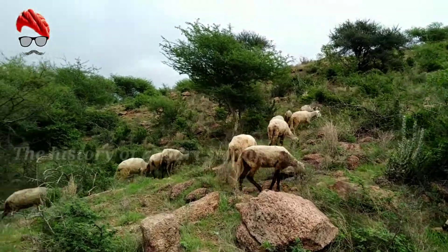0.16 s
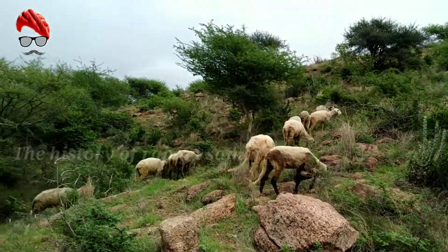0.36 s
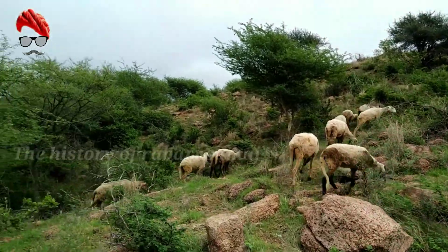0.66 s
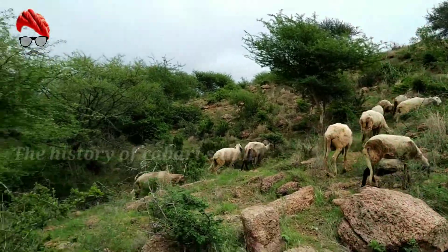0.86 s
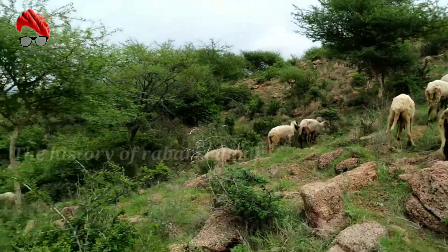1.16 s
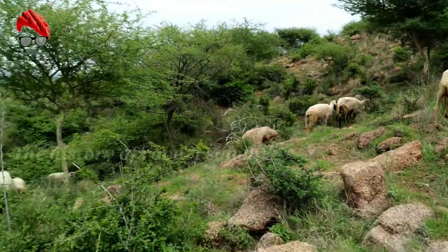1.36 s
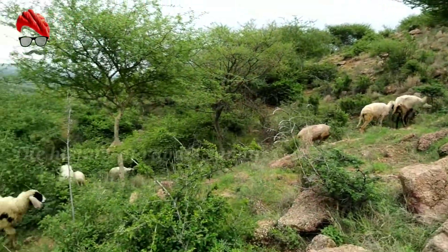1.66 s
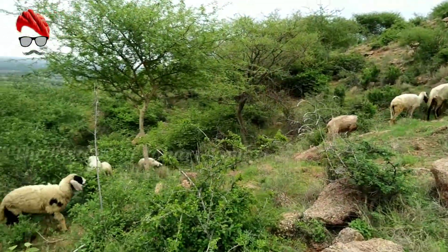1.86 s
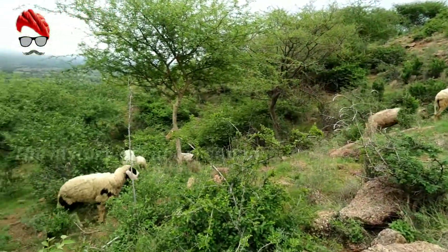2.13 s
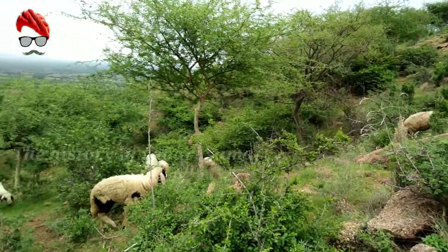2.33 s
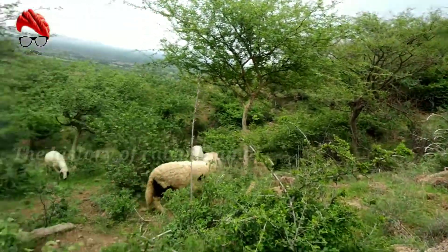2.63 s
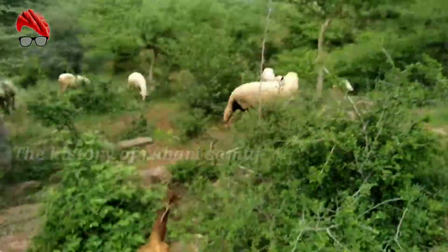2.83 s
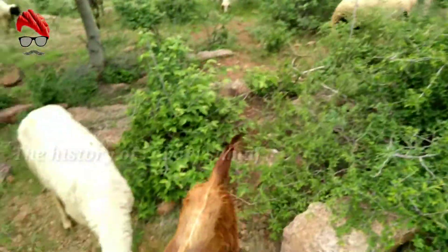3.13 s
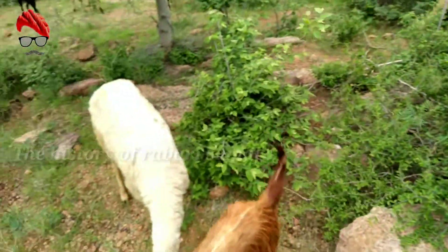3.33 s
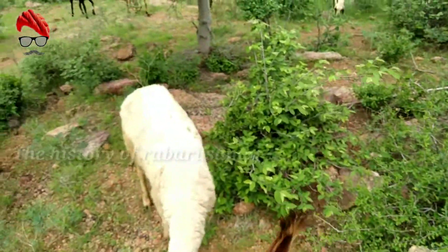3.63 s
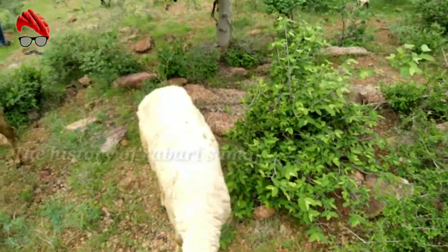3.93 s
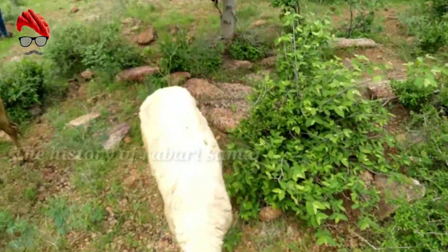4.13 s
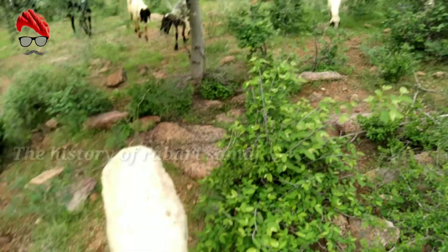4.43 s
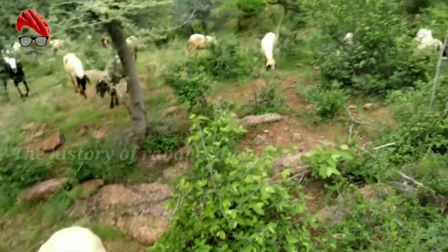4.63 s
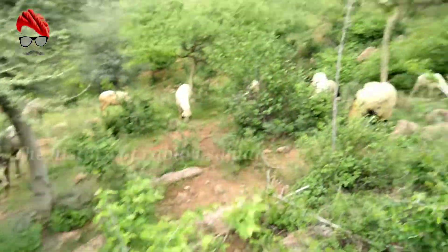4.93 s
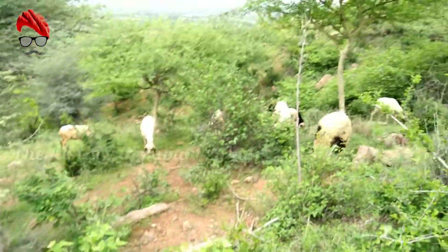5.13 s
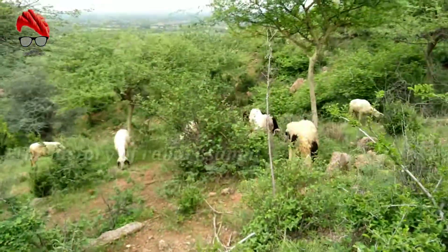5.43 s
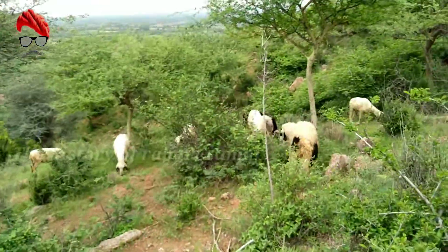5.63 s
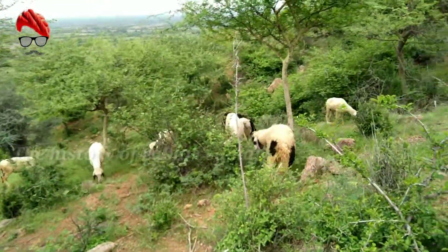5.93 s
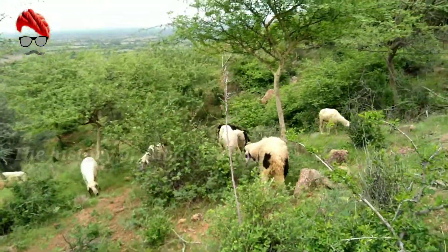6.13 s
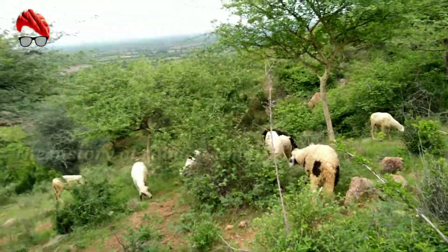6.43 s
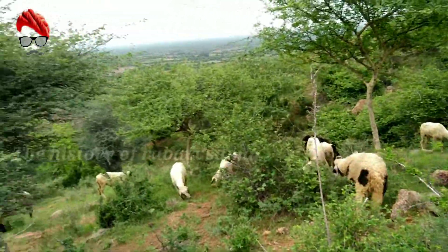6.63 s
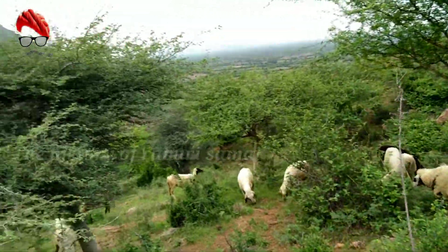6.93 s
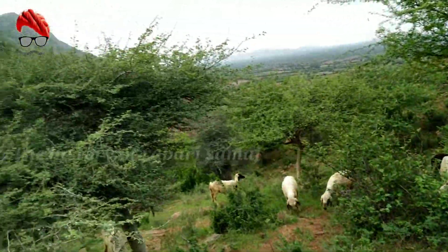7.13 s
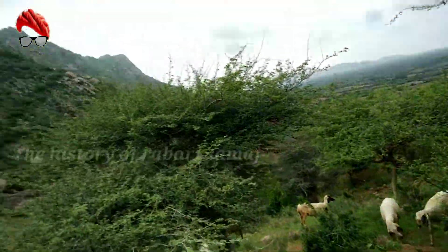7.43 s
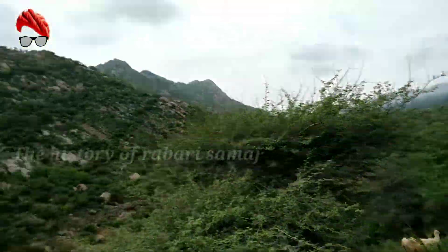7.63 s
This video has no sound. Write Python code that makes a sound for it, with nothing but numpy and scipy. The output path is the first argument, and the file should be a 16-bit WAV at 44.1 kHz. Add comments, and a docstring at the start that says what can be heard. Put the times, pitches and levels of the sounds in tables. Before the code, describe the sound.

A single loud, quavering sheep bleat, nasal then open and hoarse, over quiet hillside scrub with twig snaps, small birds and low wind.

```python
"""One loud, quavering bleat of a sheep on a scrubby hillside: voice pulses through moving resonances,
nasal at first, then wide open, hoarse at the end. The flock brushes through bushes (clumps of tiny rings)
and steps on twigs and stones (rung knocks with cracks); small birds whistle in gliding sines, an insect trills.
A hand and a sleeve rub the camera in shaped noise, a light wind rumbles on the microphone and stirs
the leaves, and the slope returns a faint echo: a decaying noise tail."""
import sys
import numpy as np
from scipy import signal
from scipy.fft import rfft, irfft, next_fast_len
from scipy.io import wavfile
from scipy.ndimage import uniform_filter1d, map_coordinates

SR = 44100
rng = np.random.default_rng(int(sys.argv[2]) if len(sys.argv) > 2 else 0)


def generate_wav(signal):
    """Clip the signal to [-1, 1] and save it as 16-bit WAV at the path in sys.argv[1]."""
    frames = np.transpose(np.atleast_2d(signal))
    scaled = np.clip(frames, -1, 1) * 32767
    pcm = np.round(scaled).astype(np.int16)
    wavfile.write(sys.argv[1], SR, pcm)


N = 343098  # samples in the scene


def amp(db):
    """Decibels to gain."""
    return 10 ** (np.asarray(db) / 20)


def unit(x):
    """Scale to rms 1."""
    return x / np.sqrt(np.mean(x ** 2) + 1e-20)


def along(points, hz):
    """(frequency [Hz], value) points read on a log frequency axis."""
    f, v = np.transpose(points)
    return np.interp(np.log(hz + 1), np.log(f + 1), v)


def curves(rows, t):
    """Each column after the time, read at the times t."""
    s, *cols = np.transpose(rows)
    return [np.interp(t, s, c) for c in cols]


def clock(length):
    """Sample times over a length in seconds."""
    return np.arange(max(int(length * SR), 8)) / SR


def wobble(rate, t):
    """A smooth random curve, rate knots a second."""
    knots = rng.standard_normal(int(len(t) * rate / SR) + 4)
    return map_coordinates(knots, [(t - t[0]) * rate])


def filtered(x, response):
    """x shaped by a (possibly complex) response of frequency."""
    m = next_fast_len(len(x) + 8192)
    return irfft(rfft(x, m) * response(np.fft.rfftfreq(m, 1 / SR)), m)[:len(x)]


def noise(spectrum, patchy_db):
    """Noise of rms 1 with the given colour, in patches of random gain over time and frequency."""
    z = signal.stft(rng.standard_normal(N), nperseg=512)[2]
    field = uniform_filter1d(rng.standard_normal(z.shape), size=5, axis=0)
    field = uniform_filter1d(field, size=8, axis=1)
    patchy = signal.istft(z * amp(patchy_db * unit(field)), nperseg=512)[1][:N]
    return unit(filtered(patchy, lambda hz: amp(along(spectrum, hz))))


def random_colour(low_hz, high_hz, points, spread_db):
    """An uneven spectrum of random levels, as (frequency [Hz], level [dB]) points."""
    return np.column_stack([np.geomspace(low_hz, high_hz, points), rng.normal(0, spread_db, points)])


def resonances(modes, f):
    """Causal response of (centre [Hz], width [Hz], level [dB]) resonances, of alternating polarity."""
    return sum((-1) ** k * amp(db) * 1j * f * w / (c * c - f * f + 1j * f * w)
               for k, (c, w, db) in enumerate(modes))


def band(f, low_hz, high_hz, order=4):
    """Gain of a band with sloping edges."""
    return 1 / np.sqrt((1 + (low_hz / (f + 1)) ** (2 * order)) * (1 + (f / high_hz) ** (2 * order)))


def add(track, s, sound):
    """Mix a sound into the track at s seconds."""
    part = track[max(round(s * SR), 0):][:len(sound)]
    part += sound[:len(part)]


def grains(length, low_hz, high_hz, rate, cycles, spread_db):
    """Tiny impacts at random moments, each a damped ring of its own pitch and size."""
    size, t = len(clock(length)), clock(0.0077)
    when, height, chance = rng.random((int(rate * length) + 1, 3)).T[:, :, None]
    hz = low_hz * (high_hz / low_hz) ** height
    strength = amp(-spread_db * np.log(chance + 0.017)) * (hz / low_hz) ** 0.15  # short rings hit harder
    rings = strength * np.sin(2 * np.pi * hz * t) * np.exp(-t * hz / cycles) * (1 - np.exp(-t * hz))
    places = (when * size).astype(int) + np.arange(len(t))
    return np.bincount(places.ravel(), rings.ravel(), size)[:size]


def throat(folds, shift, modes, low_hz, high_hz):
    """Resonances that move: filtering on a stretched time axis scales all their frequencies."""
    stretched = np.cumsum(shift)
    grid = np.arange(int(stretched[-1]) + 2)
    source = map_coordinates(folds, [np.interp(grid, stretched, np.arange(len(folds)))])
    voiced = filtered(source, lambda f: resonances(modes, f) * band(f, low_hz, high_hz, order=7))
    return unit(map_coordinates(voiced, [stretched]))


# throbs of the bleat, about 15 a second: (crest time [s], level at the crest [dB], crest pitch [Hz],
# pitch in the sag after it [Hz], dip in that sag [dB])
BLEAT_THROBS = [(1.739, -66.5, 308.3, 285.4, 20), (1.822, -60.5, 290, 270.2, 4.5),
                (1.88, -30, 300, 265.7, 15), (1.954, -26.5, 309, 268.6, 13),
                (2.013, -23.5, 299.3, 289, 0.5), (2.066, -23, 316.6, 305.7, 2),
                (2.123, -23, 317.8, 291.2, 1.5), (2.18, -22.5, 321.3, 284.5, 6),
                (2.245, -22.5, 315.4, 286.7, 7), (2.309, -21, 316.5, 285.8, 4.5),
                (2.378, -21.5, 316.9, 275.3, 8.5), (2.442, -22.5, 309.3, 271.4, 23.5),
                (2.515, -24.5, 303.7, 267.5, 23.5), (2.6, -32, 302.8, 259.6, 10),
                (2.668, -26, 295.4, 263.7, 17), (2.741, -29.5, 297.3, 261.3, 15.5),
                (2.816, -37, 290, 266.3, 18), (2.864, -55, 277.4, 269.3, 12.5)]
# hoarseness, least at the height of the voice: (time [s], relative roughness [0-1])
HOARSENESS = [(1.73, 0.01), (1.77, 0.31), (1.86, 0.08), (1.98, 0.12), (2.08, 0), (2.35, .05), (2.48, 0.2),
              (2.63, 0.23), (2.82, 0.22), (2.88, 0.33)]
# sound through the nose and from the open pharynx:
# (time [s], hum level [dB], snout level [dB], pharynx level before its dips [dB])
NASAL_LEVELS = [(1.715, -36.5, -59.5, -73.5), (1.745, -37.5, -43, -66), (1.785, -45.5, -45, -67.5),
                (1.825, -41, -46.5, -62), (1.86, -51.5, -53, -41), (2.02, -56.5, -73.5, -48),
                (2.12, -55.5, -72.5, -42.5), (2.24, -52, -74.5, -42), (2.38, -48, -72.5, -43.5),
                (2.45, -45, -71.5, -52), (2.83, -46, -57.5, -47), (2.9, -51.5, -79.5, -64)]
# the mouth opens, rounds and shuts: (time [s], middle, upper and highest formants, each over the first [dB],
# factor on the middle formants' pitch [ratio], factor on the upper formants' pitch [ratio])
MOUTH_SHAPE = [(1.82, 3, -9, -17, 0.87, 0.75), (1.875, 4, 3.5, -16.5, 0.94, .99),
               (1.955, -0.5, -4.5, -15.5, 0.99, 1), (2.02, -0.5, -12, -27, 0.97, .98),
               (2.07, -1.5, -8, -20, 1.02, 1), (2.12, -4, -6.5, -18, 1.02, 1),
               (2.18, -5, -8.5, -18, 0.96, 1.01), (2.25, -6.5, -9, -16.5, 0.99, 1),
               (2.31, -10, -14, -18.5, 0.96, 1), (2.38, -15, -18, -21, 1.006, 1.02),
               (2.445, -11, -18.5, -20.5, 1, 1.09), (2.52, -8, -18.5, -17.5, 1.03, 0.94),
               (2.6, -2.5, -13.5, -15.5, 0.97, 1.015), (2.67, -9, -16.5, -18.5, 1.02, 1),
               (2.74, -1.5, -16, -19.5, 1.02, 1.05), (2.82, 4.5, -5.5, -14, 1.013, 1.03)]
# resonances of nose and throat, from the hum upwards: (centre [Hz], width [Hz], level [dB])
NOSE_HUM = [(290, 550, 0)]
SNOUT_MODES = [(900, 100, -13), (1460, 120, 3.5), (2400, 58, 0), (3080, 110, -12)]
PHARYNX_MODE = [(650, 110, 0)]
FIRST_FORMANT = [(891, 69.4, 0)]
MIDDLE_FORMANTS = [(1585, 150, 1.5), (1770, 140, 4.5)]
UPPER_FORMANTS = [(2400, 250, -9.5), (2847, 71, 0), (3049, 92, 4)]
HIGHEST_FORMANTS = [(3320, 83, -4), (3670, 240, 0), (4100, 200, -7.5), (4380, 200, -10.5)]
# colour of the breathy hiss above the formants: (frequency [Hz], relative level [dB])
RASP_COLOUR = [(3500, -30), (4600, 2.5), (5200, 2.5), (6200, -17.5), (8000, -12.5), (9500, -16.5),
               (12000, -14.5), (14000, -41)]
RASP_DB = -37.5  # that hiss, against the first formant
PITCH_FALL_S, FORCE_FALL_S = 0.017, .027  # from a crest to the bottom of its sag
BLEAT_LEAD_S, BLEAT_TAIL_S = .03, 0.079  # voice before the first crest and after the last
BLEAT_FADE_S = .018  # the voice swells in and dies away
ONSET_HZ, ONSET_S = 44.8, .018  # the voice starts this much too high; decay time of its slide down
FIRST_FOLLOWS, MIDDLE_FOLLOWS = 0.6, 0.093  # how far a formant rises with the pitch, as an exponent
PHARYNX_DIP_DB, BRIGHT_DIP_DB = 9.5, 2.5  # a slack throb is duller: extra dips of pharynx and high formants
FALL_ROUGH, FLUTTER = .085, 0.7  # roughness added as the pitch falls; depth of the rough flutter


def bleat():
    """Vocal fold pulses through nose and throat; pitch and force climb to each crest and sag quickly after."""
    crest, crest_db, crest_hz, sag_hz, dip_db = np.transpose(BLEAT_THROBS)
    start = crest[0] - BLEAT_LEAD_S
    t = start + clock(crest[-1] + BLEAT_TAIL_S - start)
    rough, = curves(HOARSENESS, t)
    hum_db, snout_db, pharynx_db = curves(NASAL_LEVELS, t)
    middle_db, upper_db, highest_db, middle_shift, upper_shift = curves(MOUTH_SHAPE, t)

    def sawtooth(at_crest, at_sag, fall):
        """A rounded sawtooth between the values at each crest and shortly after it."""
        knots = np.column_stack([crest + .002, crest + fall])
        values = np.column_stack([at_crest, at_sag])
        return uniform_filter1d(np.interp(t, knots.ravel(), values.ravel()), size=300)

    # force stays high for most of a throb, with a short gap between throbs
    fade = np.clip(np.minimum(t - start, t[-1] - t) / BLEAT_FADE_S, 0, 1)
    sag = sawtooth(np.zeros(len(crest)), np.ones(len(crest)), FORCE_FALL_S)
    dip = np.interp(t, crest + FORCE_FALL_S, dip_db) * np.sin(np.pi / 2 * sag) ** 3.5
    throb = fade * amp(-dip)
    strength = amp(np.interp(t, crest, crest_db))
    pitch = sawtooth(crest_hz, sag_hz, PITCH_FALL_S) + ONSET_HZ * np.exp(-(t - start) / ONSET_S)
    tension, still = pitch / 302, np.ones(len(t))

    # the folds lose their regularity each time the pitch falls and in the slack gaps
    falling = uniform_filter1d(1. * (np.gradient(pitch) < -.012), size=400)
    rough = rough * (.55 + .8 * falling + 1.7 * (1 - throb)) + FALL_ROUGH * falling
    rough = np.clip(rough, 0, .55)
    jitter = .06 * rough * wobble(260, t) + .006 * wobble(90, t)
    phase = 2 * np.pi * np.cumsum(pitch * (1 + jitter)) / SR
    pulses = unit(sum(np.cos(k * phase) for k in range(1, 41)))
    air = unit(rng.standard_normal(len(t)) * (1 + 0.5 * np.cos(phase)))
    voiced = pulses * (1 + FLUTTER * rough * wobble(280, t))
    folds = voiced * (1 + rough * wobble(170, t)) + 1.8 * rough * air
    windy = folds + .5 * rough * air  # the high formants ring with more turbulence
    breathy = voiced + rough * air

    hum = amp(hum_db) * throat(breathy, still, NOSE_HUM, 140, 450)
    snout = amp(snout_db) * throat(folds, still, SNOUT_MODES, 1000, 3300)
    pharynx_gain = amp(pharynx_db - PHARYNX_DIP_DB * sag)
    pharynx = pharynx_gain * throat(breathy, still, PHARYNX_MODE, 520, 740)
    first = throat(voiced + 2.3 * rough * air, tension ** FIRST_FOLLOWS, FIRST_FORMANT, 700, 1700)
    middle_moves = middle_shift * tension ** MIDDLE_FOLLOWS
    middle = amp(middle_db) * throat(folds, middle_moves, MIDDLE_FORMANTS, 1400, 2500)
    upper = amp(upper_db) * throat(windy, upper_shift, UPPER_FORMANTS, 2100, 3600)
    highest = amp(highest_db) * throat(windy, still, HIGHEST_FORMANTS, 3200, 4457)
    rasp = amp(RASP_DB) * noise(RASP_COLOUR, patchy_db=6)[:len(t)] * unit(1 + .8 * np.cos(phase))

    dulling = amp(-BRIGHT_DIP_DB * sag ** 2)
    mouth = strength * (first + rasp + dulling * (upper + highest))
    voice = throb * (hum + snout + pharynx + mouth)
    voice -= strength * throb ** .85 * dulling * middle  # middle formants in opposite polarity
    out = np.zeros(N)
    add(out, start, voice)
    return out


TWIG_CRACK_DB, HOOF_CRACK_DB = -5.5, -24  # the sharp crack over the knock
CRUMB_DB, CRUMB_S = -11.5, 0.01  # grit giving way: relative level, decay time
CRACK_TOP = 1.3  # a crack's top over the knock's pitch, held between 5000 and 7800 Hz
SPLINTER_S, SPLINTER_DB = 0.012, -8  # fibres that tear after a crack: decay time, middle level


def snaps(contacts, crack_db):
    """Each contact is a knock of a few cycles and a short crack; crumbs of grit or fibre give way after it."""
    out, t = np.zeros(N), clock(0.17)
    onset = 1 - np.exp(-(t / .0016) ** 2)
    for s, db, hz in contacts:
        colour = random_colour(1500, 12000, 24, spread_db=5)  # each contact has its own
        push = rng.standard_normal(len(t)) * onset * np.exp(-t / (0.00089 + 0.94 / hz))
        knock = filtered(push, lambda f: resonances([(hz, 0.12 * hz, 0)], f) * band(f, hz / 3, hz * 2.15))
        top_hz = np.clip(CRACK_TOP * hz, 5000, 7800)
        crack = filtered(rng.standard_normal(len(t)),
                         lambda f: band(f, 2700, top_hz, order=6) * amp(along(colour, f)))
        splinters = amp(SPLINTER_DB + 5 * wobble(500, t)) * np.exp(-t / SPLINTER_S)
        crack = unit(crack) * onset * (np.exp(-t / 0.0014) + splinters)
        crumbs = grains(len(t) / SR, hz * 0.62, min(hz * 1.7, 9000), rate=400, cycles=9.7, spread_db=5.5)
        crumbs = np.resize(crumbs, len(t))
        crumbs = crumbs / np.abs(crumbs).max() * onset * np.exp(-t / CRUMB_S) * 2
        knock /= np.abs(knock).max()
        add(out, s, amp(db) * (knock + amp(crack_db) * crack + amp(CRUMB_DB) * crumbs))
    return out


# twigs and dry stalks snapping: (time [s], peak level of the knock [dB], pitch [Hz])
TWIG_SNAPS = [(.281, -41.5, 4530), (.294, -39, 1173), (.294, -36, 5800), (1.054, -31.5, 2250),
              (1.686, -44, 5800), (1.757, -41.5, 5600), (2.389, -48, 5143), (2.632, -33.5, 2400),
              (5.499, -46, 6200), (5.522, -39, 5670), (6.019, -39.5, 5680), (6.435, -47.5, 3750),
              (6.519, -45.5, 6080), (6.617, -44, 3640), (6.643, -43, 2700), (6.836, -46, 6940)]


def twigs():
    """Dry stalks break: the crack is nearly as strong as the knock."""
    return snaps(TWIG_SNAPS, TWIG_CRACK_DB)


# hooves on earth and stones: (time [s], peak level of the knock [dB], pitch [Hz])
HOOF_STEPS = [(1.296, -46.5, 1680), (1.62, -43.5, 1680), (2.546, -34.5, 277), (2.974, -39.5, 470.7),
              (3.247, -41.5, 283), (3.287, -45.5, 393), (3.468, -50, 1068), (4.356, -48, 422),
              (4.404, -43.5, 1400), (4.535, -36.5, 1920), (4.558, -42, 1850), (4.686, -32, 1840),
              (4.688, -43, 790), (4.829, -45, 2500), (4.975, -31.5, 1960), (5.103, -50, 1020),
              (5.2, -45, 2403), (5.498, -36, 1610), (5.529, -40, 1700), (5.579, -45.5, 1840),
              (5.625, -42.5, 1068), (6.82, -42.5, 1770), (6.846, -42, 1700), (7.083, -51.5, 520),
              (7.521, -43, 1510)]


def hooves():
    """Hooves strike earth and stones: mostly knock, with little crack."""
    return snaps(HOOF_STEPS, HOOF_CRACK_DB)


# bodies brushing through scrub and feet scuffing:
# (time [s], length [s], centre [Hz], level before the swell [dB])
SCRUB_RUSTLES = [(0.187, .11, 3000, -56.5), (0.295, .15, 7150, -58), (0.975, 0.096, 1750, -59.5),
                 (1.057, .11, 2188, -60.5), (2.604, 0.3, 6540, -55), (2.878, .12, 588, -58),
                 (3.151, 0.26, 376, -58), (3.765, 0.08, 229, -58.5), (4.524, 0.1, 1813, -60.5),
                 (4.973, .16, 5800, -62.5), (5.22, .13, 5720, -61), (5.552, 0.28, 1053, -65.5),
                 (5.544, .3, 4260, -66), (5.95, 0.13, 3040, -59.5), (6.08, 0.076, 365, -57.5),
                 (6.28, .08, 6350, -61.5), (6.515, 0.17, 4436, -60.5), (6.745, .16, 7090, -61.5),
                 (6.815, 0.087, 2000, -57)]
BASS_SPREAD, SPREAD_GROWS = 1.3, .08  # pitches reach this factor either way at 350 Hz, wider when higher


def rustles():
    """Clumps of leaf and grit impacts swell quickly and die away; each has its own uneven colour."""
    out = np.zeros(N)
    for s, length, hz, db in SCRUB_RUSTLES:
        t = clock(length)
        spread = BASS_SPREAD * (hz / 350) ** SPREAD_GROWS
        low_hz, high_hz = hz / spread, hz * spread
        clump = grains(length, low_hz, high_hz, rate=250 + .12 * high_hz, cycles=6, spread_db=5.5)
        clump = clump * amp(3.5 * wobble(60, t))
        colour = random_colour(200, 12000, 36, spread_db=3.5)
        leaves = filtered(clump, lambda f: band(f, low_hz, high_hz * 3.1, order=6) * amp(along(colour, f)))
        swell = np.abs(np.sin(np.pi * (t / t[-1]) ** 0.51))
        add(out, s, amp(db) * unit(leaves) * swell)
    return out


def brush(s, length, db, spectrum, fullness):
    """Fibres or leaves slide past together: a dense, finely grained rush that swells and fades."""
    t, out = clock(length), np.zeros(N)
    slips = rng.standard_normal(len(t)) * amp(3 * wobble(600, t) + 1.8 * wobble(110, t))
    rush = unit(filtered(slips, lambda f: amp(along(spectrum, f))))
    add(out, s, amp(db) * rush * np.abs(np.sin(np.pi * t / t[-1])) ** (1 / fullness))
    return out


# colour of a leafy branch: (frequency [Hz], relative level [dB])
BRANCH_COLOUR = [(700, -49), (1300, -14), (1900, -1.5), (2550, 2.5), (3300, 0), (4300, -7), (5550, 2.5),
                 (6300, -5.5), (7200, -17), (8200, -41), (13000, -41.5)]


def swish():
    """A leafy branch whips past: one short rush of noise."""
    return brush(s=.076, length=.112, db=-42.5, spectrum=BRANCH_COLOUR, fullness=1.2)


# resonances of the camera's case, each applied twice: (centre [Hz], width of one pass [Hz], level [dB])
CASE_MODES = [(376, 224, 5.5), (670, 194, 4.5), (1000, 220, 4), (1700, 260, 1), (2000, 330, -7.5),
              (2625, 190, 1), (3290, 430, -6), (3780, 350, -3), (4940, 450, -6)]


def case(x, low_hz, high_hz):
    """The camera's case rings with its fixed resonances, within the band that the touch excites."""
    def ringing(f):
        return sum(resonances([(hz, width, 0)], f) ** 2 * amp(level) for hz, width, level in CASE_MODES)

    return filtered(x, lambda f: ringing(f) * band(f, low_hz, high_hz, order=7))


# a hand sliding on the case: (time [s], length [s], lowest [Hz], highest [Hz], relative level [dB])
HAND_RUBS = [(3.949, 0.39, 329, 1610, -59.5), (4.675, 0.072, 250, 4100, -45.5),
             (4.749, 0.05, 280, 4300, -45), (4.956, 0.21, 910, 2560, -54.5)]


def rubs():
    """Skin slips over the case in clumps of tiny jerks, heard through the case and directly."""
    out = np.zeros(N)
    for s, length, low_hz, high_hz, db in HAND_RUBS:
        t = clock(length)
        clumps_db = 4 * wobble(600, t) + 3 * wobble(220, t) + 1.5 * wobble(70, t)
        slips = rng.standard_normal(len(t)) * amp(clumps_db)
        grip = random_colour(200, 8000, 48, spread_db=3)  # each grip damps the case differently
        skin = unit(filtered(slips, lambda f: band(f, low_hz, high_hz)))
        ring = unit(case(slips, low_hz, high_hz)) + 0.27 * skin
        ring = filtered(ring, lambda f: amp(along(grip, f)))
        add(out, s, amp(db - 1.5) * unit(ring) * np.abs(np.sin(np.pi * t / t[-1])) ** 0.41)
    return out


# fingers bumping the case: (time [s], peak level [dB], highest [Hz])
FINGER_BUMPS = [(4.058, -45, 588), (4.177, -38, 1510), (4.238, -38, 640), (4.72, -48, 3000),
                (4.785, -38.5, 1800), (4.86, -44, 600), (7.607, -40, 3800), (7.725, -32, 705),
                (7.732, -35, 5200), (7.738, -46, 1500)]
BUMP_S = 0.0042  # sets how fast a fingertip's contact dies


def bumps():
    """A fingertip's brief push sets the case ringing."""
    out, t = np.zeros(N), clock(.08)
    for s, db, high_hz in FINGER_BUMPS:
        ring = case(rng.standard_normal(len(t)) * t * np.exp(-2 * t / BUMP_S), 210, high_hz)
        add(out, s, amp(db) * ring / np.abs(ring).max())
    return out


# colour of the dragging cloth: (frequency [Hz], relative level [dB])
CLOTH_COLOUR = [(120, -6), (260, -2), (450, 1.5), (800, 3), (1000, -12), (1400, 1.5), (1800, -10),
                (2250, -26), (2650, -5), (2900, -12), (3200, 3.5), (3850, -2.5), (4250, -21), (4750, -7.5),
                (5600, 0), (6100, -18), (11500, -32), (14000, -57.5)]


def sleeve():
    """Cloth drags past the microphone as the camera swings round: a full, sustained rush of noise."""
    return brush(s=7.598, length=0.38, db=-48.5, spectrum=CLOTH_COLOUR, fullness=3.6)


FLUTTER_DB = 3.5  # depth of a bird note's flutter


def note(length, start_hz, middle_hz, end_hz, waver):
    """A fluttering whistle on a parabolic glide through three pitches."""
    t = clock(length)
    u = t / t[-1]
    pitch = start_hz * (1 - u) * (1 - 2 * u) + middle_hz * 4 * u * (1 - u) + end_hz * u * (2 * u - 1)
    phase = 2 * np.pi * np.cumsum(pitch * (1 + waver * wobble(250, t))) / SR
    return np.sin(phase) * np.sin(np.pi * u) * unit(amp(FLUTTER_DB * wobble(220, t)))


# a run of paired upward sweeps, slowing a little and loudest in the middle
RUN_START_S, PAIR_PERIOD_S, PAIR_SLOWING_S, PAIR_GAP_S = .683, .1465, .0016, .046
RUN_DB, RUN_EDGE_DB, RUN_ENTRY_DB = -46.5, -1, -1.5  # middle level; change at the ends; change on entry


def sweeps(count=7):
    """A small bird repeats a pair of quick upward sweeps; the first of a pair bends over at its top."""
    out = np.zeros(N)
    chances = rng.standard_normal((count, 3))
    for k, (place, chance) in enumerate(zip(np.linspace(-1, 1, count), chances)):
        s = RUN_START_S + PAIR_PERIOD_S * k + PAIR_SLOWING_S * k ** 2
        db = RUN_DB + RUN_EDGE_DB * place ** 2 + RUN_ENTRY_DB * (k == 0)
        hz = 1 + 0.017 * chance[2]  # each pair is tuned a little differently
        first = note(0.044, 3900 * hz, 5650 * hz, 6750 * hz, waver=0.028)
        second = note(0.034, 3750 * hz, 5550 * hz, 7200 * hz, waver=0.013)
        add(out, s - .004, amp(db + chance[0]) * first)
        add(out, s + PAIR_GAP_S, amp(db + chance[1]) * second)
    return out


# the same bird's slower rising calls: (time [s], length [s], level [dB])
RISING_CALLS = [(0, 0.073, -52.5), (0.34, 0.057, -50.5), (5.528, 0.08, -55), (5.673, 0.13, -57.5)]
# their glide: (start [Hz], middle [Hz], end [Hz])
RISING_GLIDE = (4380, 5250, 5870)
# short calls of other birds: (time [s], length [s], pitch [Hz], glide [share of the pitch], level [dB])
SHORT_WHISTLES = [(0.613, 0.059, 2490, -0.039, -56), (0.756, 0.12, 3450, 0.055, -51.5),
                  (1.421, 0.058, 2730, 0.0037, -52.5), (3.353, 0.0272, 5870, 0.087, -54.5),
                  (3.401, 0.054, 2414, -0.0083, -52), (6.558, 0.0606, 3840, 0.138, -56.5),
                  (4.56, .06, 1970, -0.12, -53), (6.099, 0.063, 2560, -0.044, -51),
                  (6.223, 0.05, 2620, -0.0058, -52.5), (6.934, 0.034, 4210, 0.105, -60.5),
                  (7.013, 0.045, 2464, -0.087, -57.5), (7.124, 0.0554, 2330, 0.17, -55),
                  (7.244, 0.069, 2100, -0.033, -47), (7.285, 0.087, 2258, 0.0089, -44),
                  (7.44, 0.049, 1770, -0.096, -49.5)]


def birds():
    """Rising calls and short whistles, each a gliding sine."""
    out = np.zeros(N)
    for s, length, db in RISING_CALLS:
        add(out, s, amp(db) * note(length, *RISING_GLIDE, waver=0.013))
    for s, length, hz, glide, db in SHORT_WHISTLES:
        call = note(length, hz * (1 - glide / 2), hz, hz * (1 + glide / 2), waver=0.02)
        add(out, s, amp(db) * call)
    return out


TRILL_S, TRILL_LENGTH_S, TRILL_DB = 5.19, 0.42, -53.5
TRILL_HZ, TRILL_RATE = 5500, 17.5  # pitch; pulses a second


def insect():
    """A thin wavering sine, unevenly pulsed."""
    t, out = clock(TRILL_LENGTH_S), np.zeros(N)
    pulsing = (.5 + .5 * np.sin(2 * np.pi * TRILL_RATE * t + 1.5 * wobble(15, t))) ** 2
    pulsing = pulsing * amp(3 * wobble(30, t) + 3 * wobble(300, t) - 2)
    pitch = TRILL_HZ * (1 + .022 * wobble(500, t) + .008 * wobble(20, t))
    tone = np.sin(2 * np.pi * np.cumsum(pitch) / SR)
    swell = np.abs(np.sin(np.pi * t / t[-1])) ** 0.19
    add(out, TRILL_S, amp(TRILL_DB) * tone * pulsing * swell)
    return out


# distant twitter: (start [s], end [s], lowest pitch [Hz], highest pitch [Hz], level of the softest chirp [dB])
TWITTER_STRETCHES = [(0, 1.7, 2986, 6475, -58.5), (4.301, 6.2, 4055, 6950, -68)]


def twitter(count=45):
    """Far birds: count random gliding chirps to each stretch, the longer ones louder."""
    out = np.zeros(N)
    for begin, end, low_hz, high_hz, db in TWITTER_STRETCHES:
        for when, height, glide, size in rng.random((count, 4)):
            hz = low_hz + height * (high_hz - low_hz)
            bend = 0.25 * (glide - .4)
            chirp = note(0.012 + 0.03 * size, hz * (1 - bend), hz, hz * (1 + bend / 2), waver=0.025)
            add(out, begin + when * (end - begin), amp(db + 2.3 * size) * chirp)
    return out


# stir of the foliage: (time [s], relative level of its body [dB], relative level of its hiss [dB])
FOLIAGE_STIR = [(0, -65, -65), (.3, -71, -60.5), (1.5, -66, -59), (3, -65.5, -69), (3.75, -70, -76.5),
                (4.2, -62, -64.5), (4.55, -67.5, -70.5), (4.98, -61, -59.5), (5.45, -66.5, -68),
                (6.25, -65.5, -68), (6.7, -68, -60.5), (7.05, -67.5, -67), (7.53, -62.5, -60),
                (7.78, -62, -57)]
# colours of body and hiss: (frequency [Hz], relative level [dB])
SOUGH_COLOUR = [(100, -15.5), (200, 12.5), (500, 10), (1000, 1.5), (2500, 5.5), (4000, -21.5), (8000, -36)]
HISS_COLOUR = [(1500, -8.5), (3500, 1.5), (5800, 8), (7500, 1), (11500, -0.5), (13000, -21.5),
               (15500, -33.5)]
TICKS_DB = -8.5  # ticks of grazing, on top of the body's curve


def foliage():
    """The wind stirs the slope's leaves, in patchy noise, among soft crackles from grazing, in tiny rings."""
    t = np.arange(N) / SR
    sough_db, hiss_db = curves(FOLIAGE_STIR, t)
    sough = amp(sough_db - 8.5 + 4.0 * wobble(34, t)) * noise(SOUGH_COLOUR, patchy_db=4.0)
    hiss = amp(hiss_db - 8 + 4.0 * wobble(25, t)) * noise(HISS_COLOUR, patchy_db=6)
    crackle = np.resize(grains(N / SR, 600, 9000, rate=130, cycles=9, spread_db=4), N)
    ticks = amp(sough_db + TICKS_DB) * unit(crackle * amp(5 * wobble(14, t)))
    return sough + hiss + ticks


# wind on the microphone: (time [s], level around which it wavers [dB])
WIND_LEVEL = [(0, -63.5), (.8, -62.5), (1.15, -70.5), (1.9, -66), (2.7, -61), (3.7, -65), (4.6, -60),
              (6.2, -65.5), (7.78, -61.5)]
# colour of the buffeting: (frequency [Hz], relative level [dB])
RUMBLE_COLOUR = [(12, -38.5), (20, -8), (70, 6), (145, -4), (172, -11.5), (211, -21.5), (247, -26),
                 (300, -26), (390, -42.5), (660, -120)]


def wind():
    """A light wind buffets the microphone: low, wavering noise."""
    t = np.arange(N) / SR
    rumble_db, = curves(WIND_LEVEL, t)
    return amp(rumble_db + 1.8 * wobble(8.9, t)) * noise(RUMBLE_COLOUR, patchy_db=3.5)


# the hillside's echo: (frequency [Hz], time to fall by 60 dB [s])
SLOPE_DECAY = [(200, 0.49), (1500, 0.3), (5000, 0.4), (12000, 0.44)]


def hillside(x):
    """Bushes and rocks scatter a thin tail; each frequency dies at its own speed."""
    hz, t, z = signal.stft(rng.standard_normal(SR // 2), SR, nperseg=256)
    decay = amp(-60 * t / along(SLOPE_DECAY, hz)[:, None])
    tail = signal.istft(z * decay, SR, nperseg=256)[1]
    delay = np.zeros(len(clock(.008)))
    return signal.fftconvolve(x, np.r_[delay, tail / np.linalg.norm(tail)])[:N]


def scene():
    """The sheep is near and the twitter is mostly echo; the hillside answers the flock and the hand too."""
    sheep = bleat()
    flock = twigs() + hooves() + rustles() + swish()
    hand = rubs() + bumps() + sleeve()
    song = sweeps() + birds() + insect()
    far = twitter()
    echo = hillside(amp(-13) * sheep + amp(-5.5) * song + far + amp(-6.5) * flock + amp(-8.5) * hand)
    return (sheep + flock + hand + song + amp(-3) * far + foliage() + wind() + echo)[None]


TOP_HZ = 15550  # the camera's band limit


def record(dry):
    """The camera adds a faint even hiss and keeps nothing above its band limit."""
    hissy = dry[0] + amp(-77.0) * rng.standard_normal(N)
    return filtered(hissy, lambda hz: hz < TOP_HZ)[None]


dry = scene()
out = record(dry)
generate_wav(out)
```